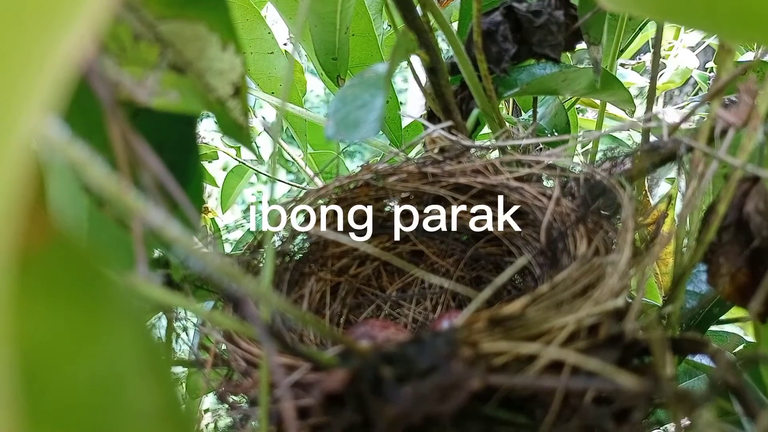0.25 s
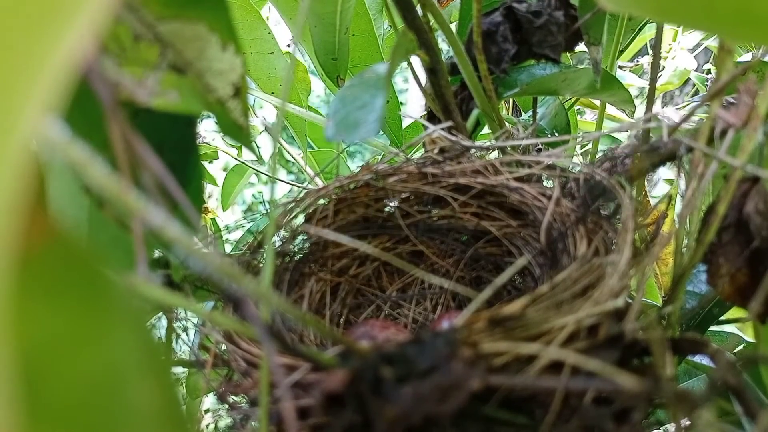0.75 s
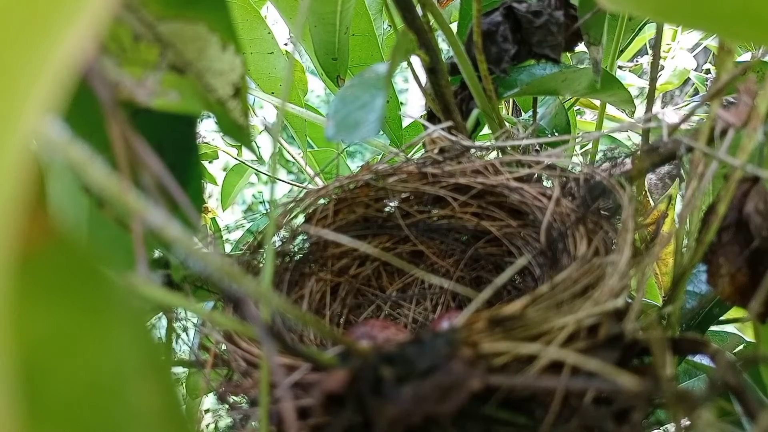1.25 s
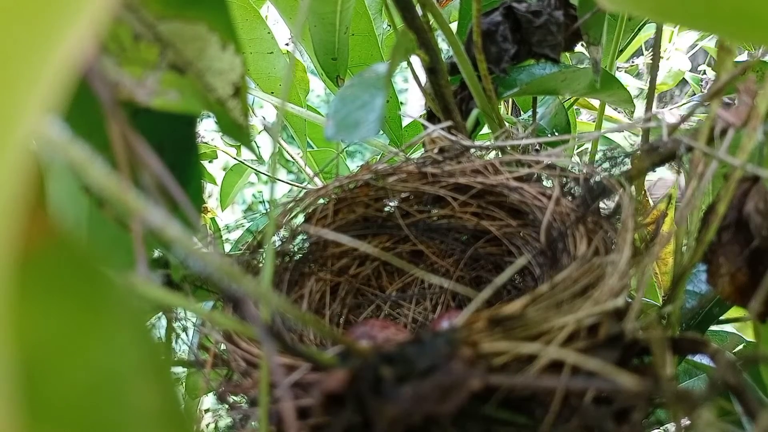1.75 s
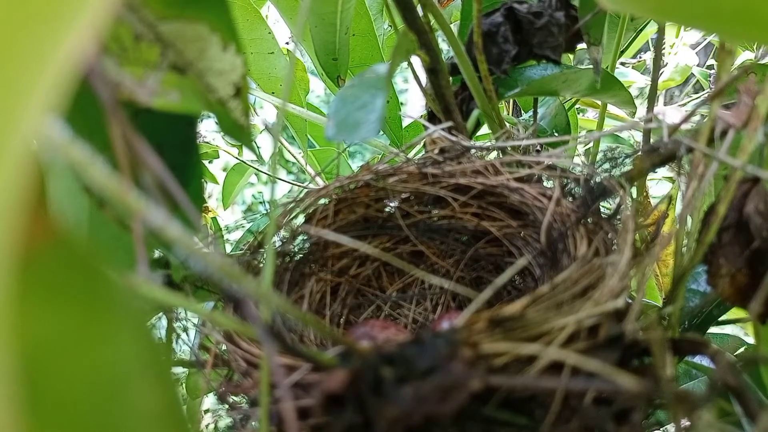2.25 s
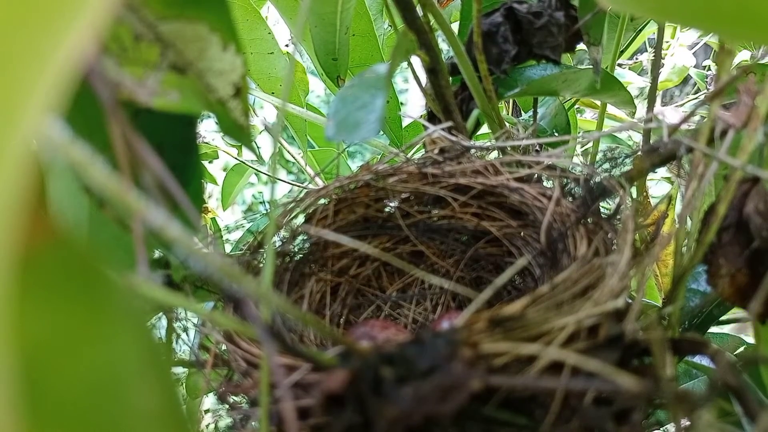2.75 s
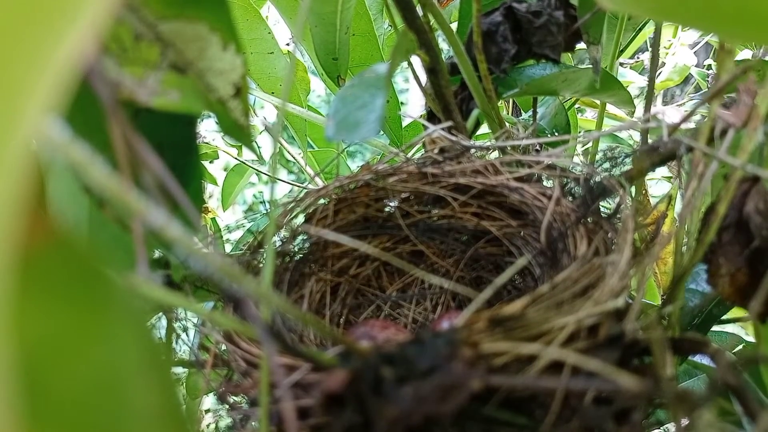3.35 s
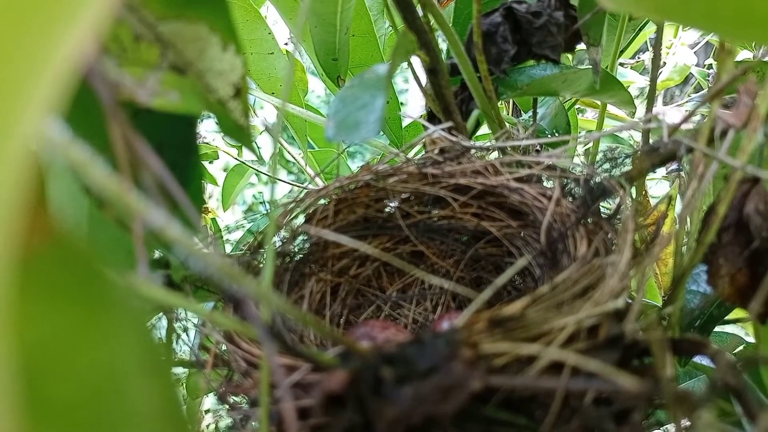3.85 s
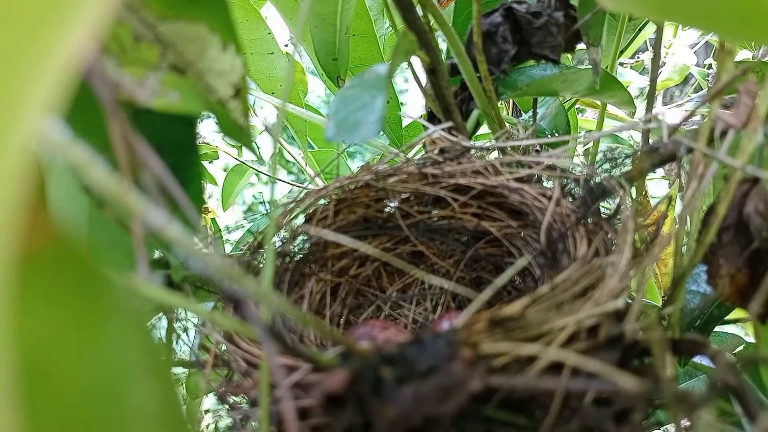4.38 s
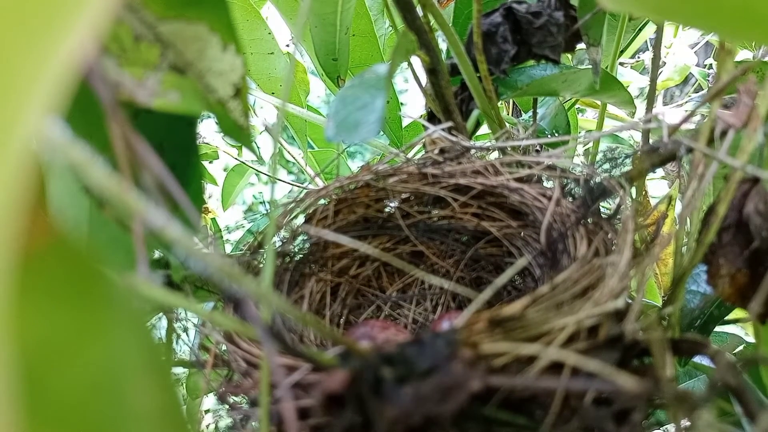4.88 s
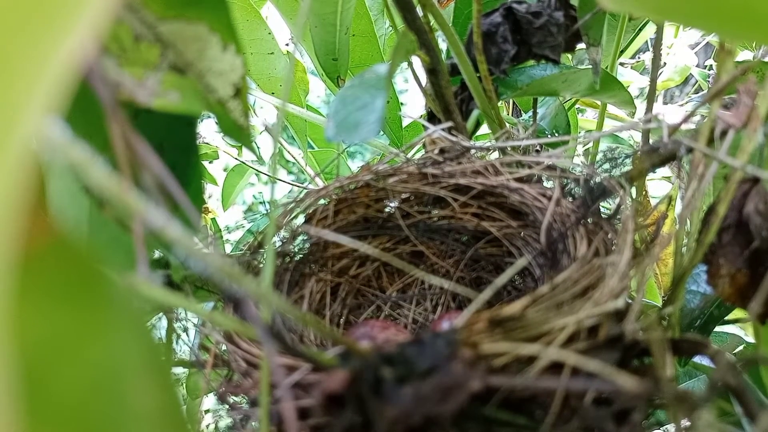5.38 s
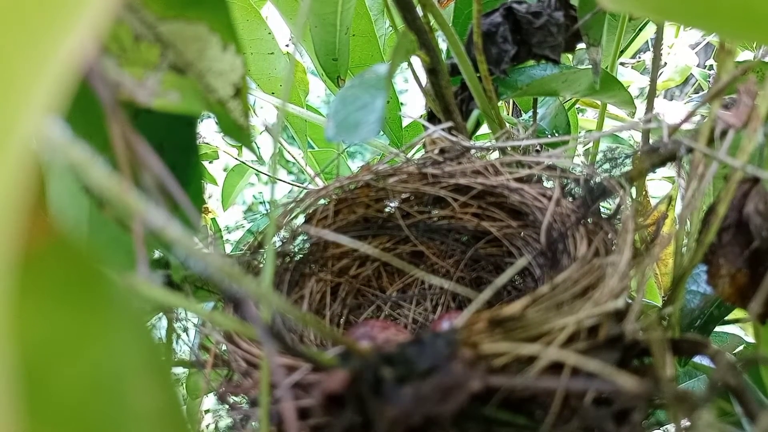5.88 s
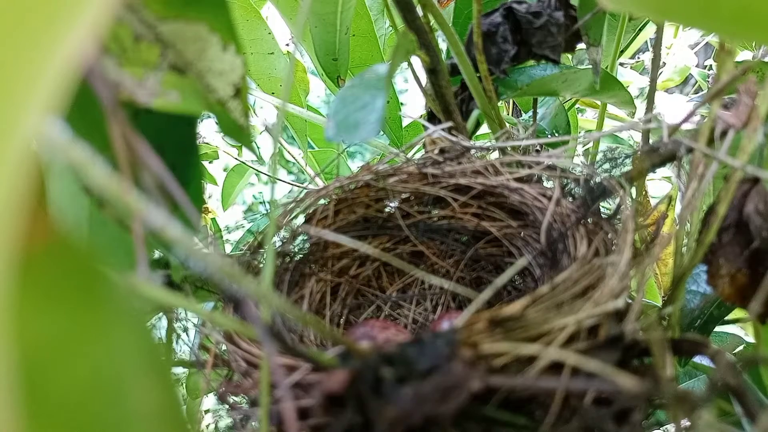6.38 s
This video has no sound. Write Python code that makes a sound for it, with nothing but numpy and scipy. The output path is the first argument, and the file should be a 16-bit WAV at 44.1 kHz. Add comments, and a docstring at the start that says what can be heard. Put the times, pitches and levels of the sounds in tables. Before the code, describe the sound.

A bird in a bush scolds in harsh, raspy rapid chak notes, faint then close and loud, with one sharp branch knock midway.

```python
"""A songbird in a bush scolds in harsh "chak" notes of about 50 ms: ragged tones near 1 kHz, mixed with rasp and hiss.
Under it lie a faint far rumble, a drone and insect bands of noise; another bird's sine whistle glides by at once.
At 1.5 s comes a hoarse arching squeak, then twig ticks and brushing grains; from 2.6 s the bird is closer and louder.
At 3.5 s noise cracks and damped modes knock a branch, which rattles amid a brush of leaves; a second whistle follows.
The scolding runs on, with two last ticks near 6.5 s. Leaves scatter all the near sounds."""
import sys
import numpy as np
from scipy import signal
from scipy.fft import rfft, irfft, next_fast_len
from scipy.io import wavfile
from scipy.ndimage import uniform_filter1d, map_coordinates

SR = 44100
rng = np.random.default_rng(int(sys.argv[2]) if len(sys.argv) > 2 else 0)


def wav_out(sig):
    """Save sig, one row per channel (or a flat mono array), as 16-bit PCM at SR to the path in sys.argv[1]."""
    wavfile.write(sys.argv[1], SR, np.round(np.clip(np.atleast_2d(sig).T, -1, 1) * 32767).astype(np.int16))


N = 291942
TIME = np.arange(N) / SR

# scolding notes: t/s, length/s, level/dB, growth from first half to second/dB, mid pitch f/Hz,
# climb/share of pitch, roughness/0-1
NOTES = [(-0.032, 0.042, -29, -2, 900.0, 0.1, 0.28), (0.037, 0.051, -31.5, -2, 956, 0.26, 0.24),
         (0.118, 0.039, -35, -6.5, 1110, 0.11, 0.6), (0.192, 0.054, -33.5, -3.5, 1094, -0.0088, 0.58),
         (0.302, 0.057, -33, 0.0, 1088, -0.072, 0.48), (0.412, 0.054, -33.5, -1.5, 1136, 0.18, 0.63),
         (0.502, 0.052, -35.5, -1.5, 1086, 0.11, 0.55), (0.611, 0.054, -32.0, -4, 1019, 0.18, 0.27),
         (0.895, 0.055, -33.0, -2, 955, 0.34, 0.39), (1.27, 0.05, -32, -0.5, 927, 0.31, 0.36),
         (1.356, 0.056, -34.5, -2.5, 940.0, 0.31, 0.2), (1.706, 0.052, -37, -2, 985, 0.3, 0.77),
         (1.801, 0.045, -38, -2.5, 918, 0.017, 0.17), (2.07, 0.055, -30.0, 0, 942, 0.38, 0.52),
         (2.268, 0.057, -33, -1.5, 922, 0.33, 0.2), (2.43, 0.055, -28, -1, 926, 0.21, 0.09),
         (2.509, 0.055, -27, -1.5, 942, 0.16, 0), (2.593, 0.06, -22, 2.5, 1051, 0.37, 0.4),
         (2.691, 0.055, -20, -1, 1021, 0.26, 0.37), (2.775, 0.055, -23.0, -1, 1015.0, 0.27, 0.26),
         (2.854, 0.057, -23.0, -1, 1037, 0.23, 0.22), (2.947, 0.059, -25.5, -1, 1044, 0.19, 0.34),
         (3.032, 0.06, -26, -4.5, 1042, 0.15, 0.42), (3.145, 0.056, -29.5, -1, 1107, 0.3, 0.5),
         (3.244, 0.061, -29, -1, 1027, 0.16, 0.28), (3.33, 0.058, -28, 1.5, 1035, 0.14, 0.38),
         (3.436, 0.052, -27, 0.0, 1085.0, 0.34, 0.28), (3.584, 0.059, -21.5, 0, 1188, 0.16, 0.46),
         (3.669, 0.057, -20.5, 2.0, 1111, 0.059, 0.3), (3.766, 0.049, -18.5, 0, 1092, 0.14, 0.23),
         (3.85, 0.056, -18.5, 2.5, 1062, 0.21, 0.07), (3.988, 0.059, -20.0, -1.5, 1143, 0.14, 0.35),
         (4.137, 0.055, -21.5, -1, 1132, 0.25, 0.45), (4.225, 0.06, -21.0, 2.0, 1046, 0.32, 0.39),
         (4.308, 0.054, -20.5, 1, 1177, 0.25, 0.27), (4.501, 0.06, -23.0, -0.5, 1049, 0.29, 0.34),
         (4.686, 0.058, -22, 0.5, 990, 0.3, 0.31), (4.813, 0.057, -20, 0, 1115, 0.37, 0.41),
         (4.91, 0.057, -19, 0.5, 1051, 0.24, 0.18), (5.005, 0.058, -20.0, 0, 1089, 0.37, 0.28),
         (5.136, 0.054, -17.5, 3, 1100.0, 0.17, 0.14), (5.23, 0.052, -18.0, -1, 1102, 0.22, 0.23),
         (5.319, 0.06, -18, 1.5, 1051, 0.23, 0.29), (5.447, 0.058, -20.0, 0.5, 1070, 0.21, 0.23),
         (5.548, 0.05, -19.5, -2.5, 1040, 0.11, 0.11), (5.644, 0.06, -19.5, 1.0, 1076, 0.21, 0.27),
         (5.847, 0.058, -19.5, 4, 1040.0, 0.18, 0.19), (5.933, 0.056, -19, 0, 1072, 0.26, 0.19),
         (6.026, 0.056, -18.5, 1, 1079, 0.17, 0.33), (6.114, 0.055, -18, 0, 1075.0, 0.11, 0.27),
         (6.218, 0.054, -18.5, 1.5, 1105, 0.24, 0.2), (6.307, 0.055, -19, 1, 1086, 0.19, 0.22)]
# partials 1-5 of the voice: relative level/dB
OVERTONES_DB = [4.5, 3.5, -4, -3.5, 3.5]
# rasp around the tone: f/multiple of the pitch, relative level per Hz/dB
RASP = [(0.301, -31), (0.58, -17), (0.8, -1), (1.221, 3.5), (1.499, -3), (1.851, -4.5), (2.3, 1.5),
        (2.8, -6), (4.2, -3), (6, -7)]
# filtering by throat and beak: f/Hz, relative level/dB
THROAT = [(200, -42), (400, -16.5), (650, -13.5), (880, -9), (1130, -4.5), (1400, -2), (1650, -2.5),
          (2250, 0.5), (2520, 1.5), (2780, -4), (3000, 1), (3200, 1), (3700, -10), (4300, -26.5),
          (5100, -49.5), (7000, -65)]
# slow opening and shutting of the beak: t/s, level above 2.7 kHz/dB
BEAK = [(0.0, -8.5), (0.15, 7.5), (0.4, 3), (0.53, -8.5), (1.35, -13.5), (1.7, 3.5), (2.07, -1), (2.3, -8),
        (2.8, -6), (3.0, 0), (3.45, 1.5), (3.6, 6), (4.5, 1.5), (5.0, -8), (5.55, 3.5), (6.3, 3)]
# hiss within a note: f/Hz, relative level per Hz/dB
HISS = [(3500, -14), (4600, -3), (5150, -5), (5700, 0), (6500, 1), (7500, -9), (8400, 2), (9400, -3),
        (10300, -20), (12000, -30)]
# hiss through the scolding: t/s, level against the voice/dB
HISS_DB = [(0.15, -35.5), (0.42, -46), (0.9, -40), (2.45, -34), (2.62, -45), (3.2, -35.5), (3.44, -37.5),
           (3.6, -44), (4.35, -47), (4.9, -37), (5.2, -42.5), (6.3, -44)]
# thin sizzle above the hiss: f/Hz, relative level per Hz/dB
SIZZLE = [(9000, -35), (10500, -24), (12300, -20), (13200, -6), (13900, -5), (14400, -9), (15150, 2),
          (15500, 0), (15900, -14)]
# sizzle through the scolding: t/s, level against the voice/dB
SIZZLE_DB = [(0.15, -42), (0.6, -46), (1.6, -40), (2.62, -48), (3.1, -37), (4.25, -43.5), (4.75, -36),
             (5.6, -41)]
# narrow resonance that some runs of notes hiss through: f/Hz, relative level per Hz/dB
WHEEZE = [(4000, -25), (4600, -7.5), (5300, 0.5), (5800, -22.5), (7000, -44.5)]
# wheeze through the scolding: t/s, level against the voice/dB
WHEEZE_DB = [(1.4, -54), (2.4, -42), (3.4, -43), (3.7, -60.5), (4.5, -55), (4.9, -37), (5.35, -59)]
# still air with its far rumble: f/Hz, relative level per Hz/dB
AIR = [(25, -26), (85, -11), (150, -1), (250, -9.5), (500, -14), (1200, -20), (2300, -18.5), (3400, -20),
       (4600, -31.5), (7000, -40), (10400, -38), (12200, -44), (16000, -52.5)]
# air and rumble over time: t/s, level/dB
RUMBLE_DB = [(0.3, -58.5), (0.72, -62), (1.68, -61.5), (1.95, -59), (6.6, -60.5)]
# steady narrow bands, a far drone and two of insects: f/Hz, spread to either side/Hz, level/dB
DRONES = [(149.4, 16, -71), (8870, 590, -75), (11240, 420, -87.5)]
# another bird's far whistles: t/s, length/s, starting f/Hz, glide/Hz, level/dB
WHISTLES = [(0.03, 0.29, 3590, -110, -57), (3.9, 0.24, 3390, 90, -62)]
# colour of the brushing and of the squeak's hoarseness: f/Hz, relative level per Hz/dB
LEAVES = [(150, 0.5), (450, -6), (900, 4.5), (2200, -1), (3600, -0.5), (5000, -14.5), (7000, -23.5),
          (9000, -16.5), (12000, -33.5), (15500, -19.5)]
# knocks and twig ticks: t/s, crack level/dB, crack decay/s, thud level/dB
KNOCKS = [(1.882, -50, 0.0028, -52), (1.924, -49, 0.008, -55), (2.138, -46, 0.003, -59),
          (3.495, -63, 0.002, -42), (3.5128, -30.5, 0.0038, -65), (3.541, -14, 0.0023, -28),
          (3.5451, -21, 0.0014, -25), (3.549, -14, 0.0012, -25), (3.648, -46, 0.003, -48),
          (3.778, -56, 0.0028, -44), (6.5161, -26.5, 0.00096, -58), (6.603, -41.5, 0.0017, -69)]
# crack on wood: f/Hz, relative level per Hz/dB
CRACK = [(150, -5.5), (500, -2), (900, -8), (2200, -3.5), (3600, -2.5), (5000, -23), (7000, -30.5),
         (9000, -15.5), (12000, -34), (15500, -29)]
# modes of the branch, retuned at each blow: nominal f/Hz, relative level/dB, t60/s
BRANCH = [(108, -2.5, 0.033), (183, 0, 0.057), (290, 2.5, 0.03), (437, -2, 0.022), (550, -2, 0.028),
          (720, -1, 0.022)]
# wings and leaves brushing: t/s, rise over 20 dB/s, hold/s, fall over 20 dB/s, level/dB
BRUSHES = [(1.933, 0.008, 0.015, 0.034, -59), (1.98, 0.044, 0.036, 0.018, -41),
           (2.127, 0.15, 0.012, 0.038, -52), (3.539, 0.048, 0.04, 0.11, -35)]

# a note swells quickly, holds for most of its length, then dies ever faster (20 dB down after RELEASE_S)
ATTACK_S, ATTACK_DB_PER_S, HOLD_SHARE, RELEASE_S, RELEASE_BEND = 0.0044, 1851, 0.82, 0.0185, 1.64
# roughness held and added at start and end; the rasp sags there (share of the pitch)
ROUGH_HELD, ROUGH_START, ROUGH_END, SAG_START, SAG_END, SETTLE_S = 0.36, 0.42, 0.5, 0.25, 0.38, 0.014
# pitch scoops up from below and wanders as it climbs (shares of the pitch)
SCOOP, SCOOP_S, WANDER, WANDER_HZ = 0.2, 0.0101, 0.0448, 57
BEAK_EDGE = 1.4  # near 4.2 kHz the beak's lift or cut in dB is this many times as much
# dB below 1.3 kHz: at a note level of -19.5 dB, per dB of beak opening, per dB of note level
CHEST_DB, CHEST_PER_BEAK, CHEST_PER_LEVEL = -0.4, 0.2, -0.17
SQUEAK_START_S, SQUEAK_S, SQUEAK_LOW_HZ, SQUEAK_TOP_HZ, SQUEAK_DB = 1.499, 0.083, 1430, 2720, -45.5
RUSTLE_LOW_HZ = 110  # leaves radiate little below this
# timing and levels of the branch's first bounce, and the loss from each bounce to the next
RATTLE_START_S, RATTLE_GAP_S, RATTLE_DECAY_S = 3.563, 0.018, 0.0023
RATTLE_CRACK_DB, RATTLE_THUD_DB, RATTLE_LOSS_DB = -35, -30.5, 3.5
EDGE_HZ = 15700


def amp(db):
    """Decibels to gain."""
    return 10 ** (np.asarray(db) / 20)


def unit(x):
    """Scales to an rms of 1."""
    return x / np.sqrt(np.mean(x ** 2) + 1e-20)


def between(x):
    """Holds a share between 0 and 1."""
    return np.clip(x, 0, 1)


def curve(points, t):
    """Reads a table of (t/s, level/dB) at the given time."""
    return np.interp(t, *np.transpose(points))


def colour(x, points):
    """Filters x by a spectrum of (f/Hz, level/dB) points."""
    f, db = np.transpose(points)
    size = next_fast_len(len(x) + 1024)
    hz = np.fft.rfftfreq(size, 1 / SR)
    gain = amp(np.interp(np.log(hz + 1), np.log(f), db))
    return irfft(rfft(x, size) * gain, size)[:len(x)]


def noise(points, size):
    """Noise of rms 1 with the given spectrum."""
    return unit(colour(rng.standard_normal(size), points))


def wobble(rate_hz, size):
    """A random curve of rms 1 that moves at up to about the given rate."""
    hz = np.fft.rfftfreq(size, 1 / SR)
    lowpass = np.exp(-(hz / rate_hz) ** 2) * (hz > 0)
    return unit(irfft(rfft(rng.standard_normal(size)) * lowpass, size))


def highpass(x, edge_hz):
    """A gentle cut of the deep bass."""
    return signal.sosfilt(signal.butter(2, edge_hz, "high", fs=SR, output="sos"), x)


def add(mix, s, sound):
    """Mixes a sound in at time s, trimmed to the scene."""
    start = round(s * SR)
    sound = sound[max(-start, 0):]
    part = mix[max(start, 0):][:len(sound)]
    part += sound[:len(part)]


def rasp(pitch):
    """Noise whose whole spectrum is stretched with the pitch: it is read faster as the pitch climbs."""
    reference_hz = 1000
    place = np.cumsum(pitch / reference_hz)
    spectrum = [(k * reference_hz, db) for k, db in RASP] + [(8000, -60)]
    source = noise(spectrum, int(place[-1]) + 8)
    return map_coordinates(source, [place], order=3, mode="nearest")


def syrinx(pitch, sag, rough, jitter=0.047, fray_hz=240, fray=1.2, raspiness=0.85, flutter_db=4.0,
           saturation=0.38):
    """One side sings a tone with fraying partials; the other rasps along, sagging when the pressure is low."""
    size = len(pitch)
    unsteady = jitter * rough * wobble(500, size) + 0.015 * wobble(190, size)
    turns = np.cumsum(pitch * (1 + unsteady)) / SR
    loose = np.clip(fray * rough, 0, 0.97)
    tone = np.zeros(size)
    for k, db in enumerate(OVERTONES_DB, 1):
        ragged = (wobble(fray_hz, size) + 1j * wobble(fray_hz, size)) / np.sqrt(2)
        strength = np.sqrt(1 - loose ** 2) + loose * ragged
        tone += amp(db) * (strength * np.exp(2j * np.pi * (k * turns + rng.random()))).real
    puffs = unit(rasp(pitch * sag) * amp(flutter_db * wobble(520, size)))
    share = np.clip(raspiness * rough, 0, 0.95)
    sound = np.sqrt(1 - share ** 2) * unit(tone) + share * puffs
    # the membranes can only swing so far, which evens out the strongest bursts
    return sound / (uniform_filter1d(sound ** 2, size=130) + 1e-6) ** (saturation / 2)


def note(s, length, level_db, growth_db, pitch_hz, climb, roughness):
    """One "chak": a harsh attack, an uneven climb in pitch, and a rasp that sinks as the note dies."""
    t = np.arange(-0.02, 0.09, 1 / SR)
    size = len(t)
    before = np.maximum(ATTACK_S - t, 0)
    after = np.maximum(t - HOLD_SHARE * length, 0) / RELEASE_S
    progress = between(t / length) - 0.5
    held_db = level_db + growth_db * np.clip(2 * progress, -0.5, 0.5)
    swell = amp(held_db - ATTACK_DB_PER_S * before - 20 * after ** RELEASE_BEND)

    scoop = SCOOP * between(before / SCOOP_S)
    pitch = pitch_hz * (1 + climb * progress - scoop + WANDER * wobble(WANDER_HZ, size))
    starting, ending = between(1 - t / SETTLE_S), between(after)
    sag = 1 - SAG_START * starting - SAG_END * ending
    rough = roughness + ROUGH_HELD + ROUGH_START * starting + ROUGH_END * ending

    beak_db = curve(BEAK, s)
    chest_db = CHEST_DB + CHEST_PER_BEAK * beak_db + CHEST_PER_LEVEL * (level_db + 19.5)
    opening = [(1300, chest_db), (1750, 0.0026), (2520, 0), (2850, beak_db), (3700, beak_db),
               (4250, BEAK_EDGE * beak_db), (4800, 0.12 * beak_db)]
    voice = colour(colour(syrinx(pitch, sag, rough), THROAT), opening)
    voice = voice / np.std(voice[(t > 0) & (t < length)])

    breath = amp(curve(HISS_DB, s)) * noise(HISS, size)
    breath += amp(curve(SIZZLE_DB, s)) * noise(SIZZLE, size)
    breath += amp(curve(WHEEZE_DB, s)) * noise(WHEEZE, size)
    return s + t[0], swell * (voice + breath * amp(0.89 * wobble(400, size)))


def scolding():
    """The voice: all the notes, each sung afresh."""
    out = np.zeros(N)
    for row in NOTES:
        add(out, *note(*row))
    return out


def rumble_and_insects():
    """Coloured noise for the far rumble and air; randomly modulated carriers for drone and insects."""
    out = noise(AIR, N) * amp(curve(RUMBLE_DB, TIME) + 1.1 * wobble(11.0, N))
    for hz, width, db in DRONES:
        angle = 2 * np.pi * hz * TIME
        out += amp(db) * unit(wobble(width, N) * np.cos(angle) + wobble(width, N) * np.sin(angle))
    return out


def whistles():
    """Distant pure tones that glide with an unsteady pitch."""
    out = np.zeros(N)
    for s, length, hz, glide, db in WHISTLES:
        t = np.arange(0, length, 1 / SR)
        turns = np.cumsum(hz + glide * t / length + 85 * wobble(240, len(t))) / SR
        add(out, s, amp(db) * unit(np.sin(2 * np.pi * turns) * signal.windows.tukey(len(t), 0.5)))
    return out


def squeak(arch=0.88, lateness=1.35, jitter=0.102, octave_db=-25, hoarse_db=-12):
    """A thin, hoarse tone with a weak octave; its pitch arches up and falls part of the way back."""
    phase = np.linspace(0, 1, round(SQUEAK_S * SR))
    size = len(phase)
    hz = SQUEAK_LOW_HZ + (SQUEAK_TOP_HZ - SQUEAK_LOW_HZ) * np.sin(np.pi * arch * phase ** lateness)
    turns = np.cumsum(hz * (1 + jitter * wobble(710, size))) / SR
    sound = np.sin(2 * np.pi * turns) + amp(octave_db) * np.sin(4 * np.pi * turns)
    sound += amp(hoarse_db) * noise(LEAVES, size)
    out = np.zeros(N)
    add(out, SQUEAK_START_S, amp(SQUEAK_DB) * unit(sound) * signal.windows.tukey(size, 0.3))
    return out


def knocks():
    """Each blow cracks briefly and sets the damped branch thudding; so thin a branch radiates little deep bass."""
    out, t = np.zeros(N), np.arange(6000) / SR
    onset = 1 - np.exp(-t / 0.00038)
    for s, crack_db, decay, thud_db in list(KNOCKS) + rattle():
        crack = noise(CRACK, len(t)) * np.exp(-t / decay)
        thud = np.zeros(len(t))
        for hz, db, t60 in BRANCH:
            turns = hz * rng.uniform(0.73, 1.17) * t + rng.random()
            thud += amp(db - 60 * t / t60) * np.sin(2 * np.pi * turns)
        add(out, s, amp(crack_db) * crack + amp(thud_db) * 0.72 * thud * onset)
    return highpass(out, 125)


def rustle():
    """Feathers brush the leaves: soft, uneven swishes of dense tiny grains."""
    grains = rng.standard_normal(N) * (rng.random(N) < 7000 / SR)  # about 7000 a second
    source = unit(grains) + 0.48 * rng.standard_normal(N)
    swish = highpass(unit(colour(source, LEAVES) * amp(0.72 * wobble(120, N))), RUSTLE_LOW_HZ)
    strokes = np.zeros(N)
    for s, rise, hold, fall, db in BRUSHES:
        rise_db = 20 * np.maximum((s - TIME) / rise, 0)
        fall_db = 20 * np.maximum((TIME - s - hold) / fall, 0)
        strokes += amp(db - rise_db - fall_db)
    return swish * strokes


def rattle(count=4):
    """After the big knock the branch bounces on as more knocks, each weaker than the last."""
    return [(RATTLE_START_S + k * RATTLE_GAP_S, RATTLE_CRACK_DB - k * RATTLE_LOSS_DB,
             RATTLE_DECAY_S, RATTLE_THUD_DB - k * RATTLE_LOSS_DB) for k in range(count)]


def foliage(x, near_db=-13, near_t60=0.026, far_db=-36, far_t60=0.16):
    """Nearby leaves scatter the sound at once; the trees around return a very faint tail."""
    t = np.arange(SR // 2) / SR
    sparse = rng.random((2, len(t))) < 3000 / SR  # about 3000 echoes a second
    near, far = rng.standard_normal((2, len(t))) * sparse * (t > 0.001)
    near, far = near * amp(-60 * t / near_t60), far * amp(-60 * t / far_t60)
    echoes = amp(near_db) * near / np.linalg.norm(near) + amp(far_db) * far / np.linalg.norm(far)
    return x + signal.fftconvolve(x, echoes)[:N]


def scene():
    """The bird in its bush, scattered by leaves, over the unscattered background."""
    bush = foliage(scolding() + squeak() + knocks() + rustle())
    return (bush + rumble_and_insects() + whistles())[None]


def record(dry):
    """A steep lowpass that limits the band."""
    lowpass = signal.firwin(511, EDGE_HZ, window=("kaiser", 9), fs=SR)
    return signal.oaconvolve(dry, lowpass[None], "same")


dry = scene()
out = record(dry)
wav_out(out)
```